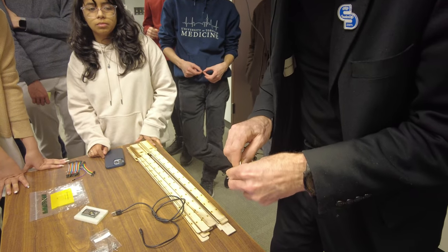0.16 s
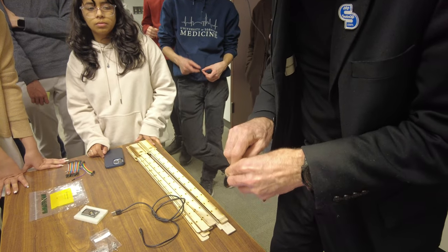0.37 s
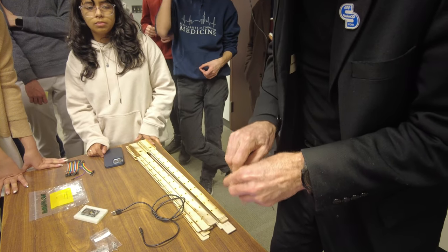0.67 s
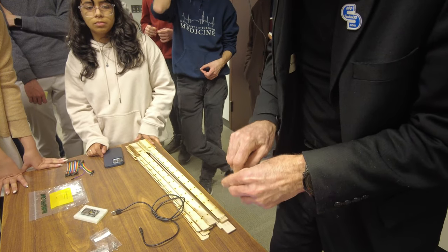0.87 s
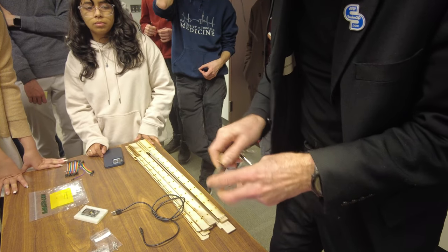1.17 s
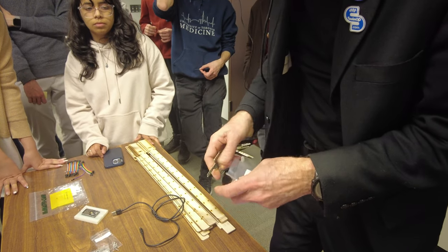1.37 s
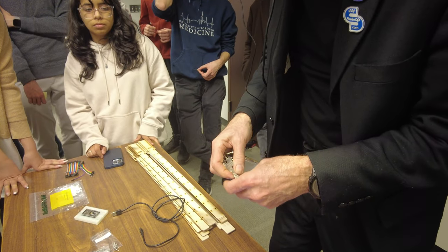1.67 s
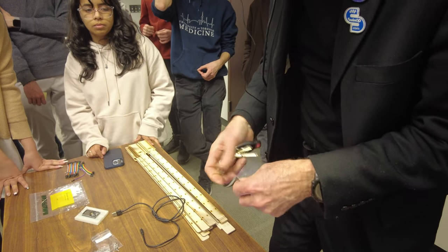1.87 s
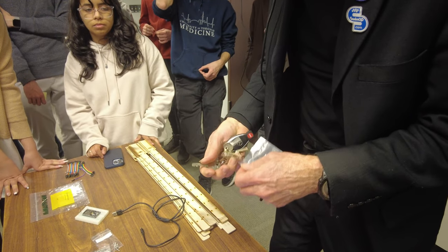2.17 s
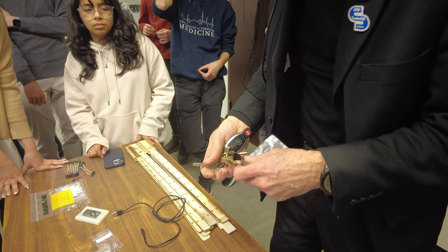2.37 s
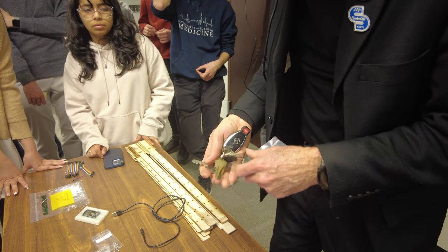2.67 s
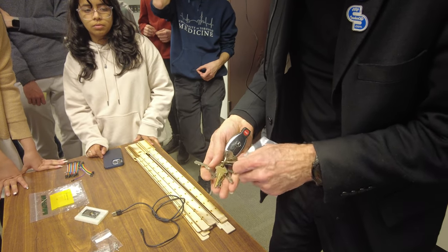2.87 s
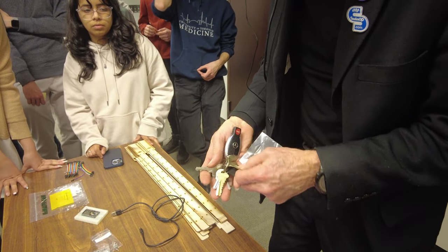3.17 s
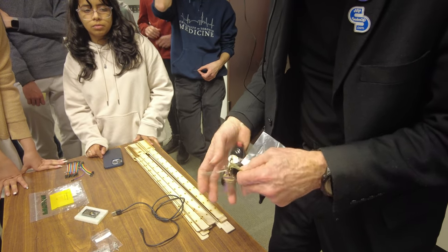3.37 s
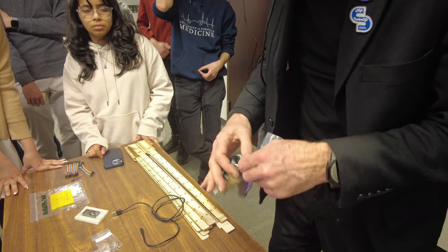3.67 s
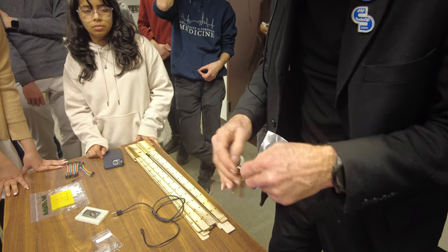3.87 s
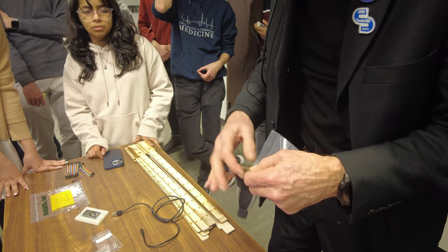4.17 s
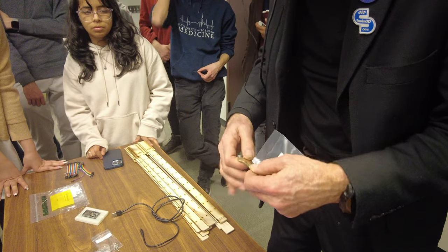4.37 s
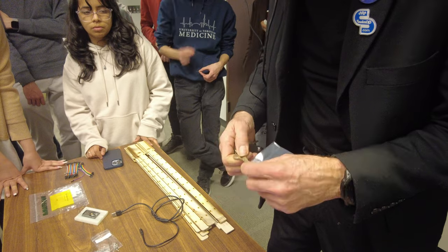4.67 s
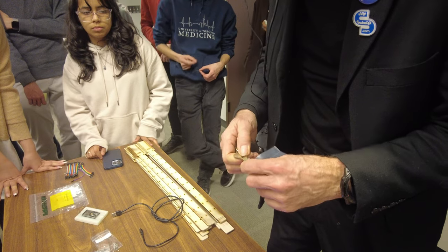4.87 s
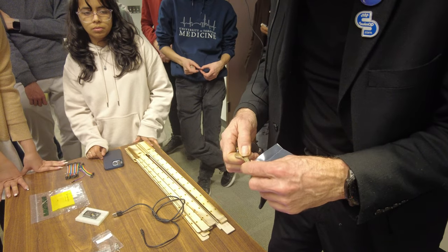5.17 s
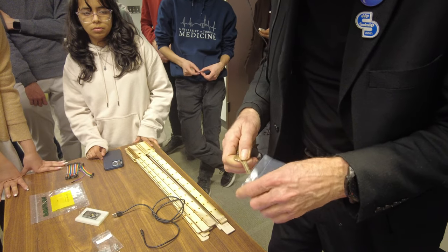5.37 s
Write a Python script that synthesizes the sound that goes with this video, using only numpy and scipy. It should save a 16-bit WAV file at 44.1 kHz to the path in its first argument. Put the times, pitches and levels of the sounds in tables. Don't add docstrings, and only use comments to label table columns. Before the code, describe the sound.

A steady low ventilation rumble with faint air hiss fills a quiet, fairly dry room. Close by, at arm's length, a small foil bag gives soft creases and rubs from 0.2 s, with its sharpest dry snaps at 0.7 to 0.8 s and light rustling until about 1.2 s. From 1.3 s keys begin to tick, with a clear click at 1.6 s and a denser run of little clinks from 2.0 to 2.4 s; a faint rubber sole squeaks farther away near 2.2 s. Bright clinks follow at 2.7 s, then sparse taps around 3.0 to 3.3 s. From 3.4 to 4.3 s the bunch jangles loosely, the strongest clash near 3.5 s, with short high rings quickly damped by fingers. A few clicks near 4.5 s give way to faint isolated ticks, and a soft bag stroke ends it around 5.5 s.

```python
import sys
import numpy as np
from scipy import signal
from scipy.fft import rfft, irfft, next_fast_len
from scipy.io import wavfile
from scipy.ndimage import uniform_filter1d

SR = 44100
rng = np.random.default_rng(int(sys.argv[2]) if len(sys.argv) > 2 else 0)


def gain_from_db(level_db):
    decades = np.asarray(level_db, float) / 20
    return 10 ** decades


def unload_wav(signal):
    wavfile.write(
        sys.argv[1],
        SR,
        np.round(np.clip(np.atleast_2d(signal).T, -1, 1) * 32767).astype(np.int16),
    )


N = 243178
SPAN = 8192
PORTS = np.array([[1], [-1]])

# (frequency [Hz], bandwidth [Hz], level [dB])
KEY_MODES = [(5680, 45, -5), (6350, 170, -10), (7440, 37, -10), (7590, 29, -11), (7770, 25, -11),
             (8540, 90, -16), (9260, 70, -15), (9470, 78, -14), (9790, 45, -15), (10400, 37, -5),
             (11100, 46, 0), (12400, 96, -1), (13200, 79, -6), (13700, 37, -5), (14400, 56, -3),
             (14600, 29, -5), (14900, 63, -3), (15200, 58, -1)]


def rms_one(x):
    return x / np.sqrt(np.mean(np.abs(x) ** 2) + 1e-20)


def at_hz(points, hz):
    points = np.array(points)
    return np.interp(np.log(hz), np.log(points[:, 0]), points[:, 1])


def gate(t, start, stop, rise, fall):
    release = 1 + np.exp(np.clip((t - stop) / fall, -50, 50))
    return np.clip((t - start) / rise, 0, 1) / release


def add(out, s, sound):
    at = round(s * SR)
    out[..., at:at + sound.shape[-1]] += sound


def resonance(grid_hz, hz, width_hz):
    damping = 1j * grid_hz * width_hz
    return damping / (hz ** 2 - grid_hz ** 2 + damping)


def grains(shape, per_s, spread_db):
    sizes = gain_from_db(spread_db * np.minimum(rng.exponential(1, shape), 4)) * rng.choice([-1, 1], shape)
    return sizes * (rng.random(shape) < per_s / SR)


def scattered(clicks, hz, colour, count):
    spacing_hz = 1000
    dealt = rng.integers(0, count, clicks.shape)
    regions = np.exp(-(hz / spacing_hz - np.arange(count)[:, None]) ** 2)
    regions = regions / np.sqrt(np.sum(regions ** 2, axis=0) + 1e-20)
    spectrum = sum(rfft(clicks * (dealt == k)) * region for k, region in enumerate(regions))
    return irfft(colour * spectrum, len(clicks))


def ventilation(spectrum, db):
    # (frequency [Hz], correlation [1])
    likeness = [(60, 1), (230, 0.91), (550, 0.21), (1650, 0.37), (4970, -0.17), (15000, 0.019)]
    # (frequency [Hz], left minus right [dB])
    balance = [(25, -2.5), (60, -0.5), (240, 1), (950, 2), (3770, 0), (15000, 1.5)]
    hz = np.fft.rfftfreq(N, 1 / SR) + 1
    mid, side = rfft(rng.standard_normal((2, N))) * gain_from_db(at_hz(spectrum, hz))
    alike = np.clip(at_hz(likeness, hz), -.99, .99)
    lean = at_hz(balance, hz) / 2
    pair = np.sqrt(1 + alike) * mid + np.sqrt(1 - alike) * side * PORTS
    return gain_from_db(db) * rms_one(irfft(pair * gain_from_db([lean, -lean]), N))


def background():
    # (frequency [Hz], density [dB per Hz])
    rumble = [(12, -37), (20, 1), (40, -2), (69, -14.5), (103, -4), (151, -14), (189, -16.5), (320, -27.5),
              (357, -27.5), (515, -29), (720, -35), (900, -39.5), (1170, -72), (1980, -120)]
    # (frequency [Hz], density [dB per Hz])
    hiss = [(530, -49), (900, -8.5), (1100, -8.5), (1410, -4), (1700, -8), (2860, -8.5), (3470, -12.5),
            (5350, -12), (6030, -10.5), (9200, -16.5), (10100, -22.5), (10900, -23.5), (16000, -22)]
    return ventilation(rumble, -45.5) + ventilation(hiss, -69.5)


def room(x):
    t60_s, treble_t60_share, level_db, wall_cut_hz = 0.12, .6, -9.5, 8500
    size, t = next_fast_len(N + SPAN), np.arange(SPAN) / SR
    dull = 1 / (1 + (np.fft.rfftfreq(size, 1 / SR) / wall_cut_hz) ** 4)
    first_echo = gate(t, .003, 0.93, 0.006, 1)
    echoes = rng.standard_normal((2, SPAN)) * first_echo * gain_from_db(-60 * t / t60_s)
    echoes = echoes / np.linalg.norm(echoes[0])
    short = echoes * gain_from_db(-60 * t / t60_s * (1 / treble_t60_share - 1))
    tail = dull * rfft(echoes, size) + (1 - dull) * rfft(short, size)
    return gain_from_db(level_db) * irfft(tail * rfft(x, size), size)[:, :N]


def squeak():
    start_s, hold_s, level_db, swell_db_per_s = 2.174, 0.065, -60, 70
    start_hz, sag_hz_per_s = 815, 1300
    t = np.arange(N) / SR - start_s
    wobble, grip = rms_one(uniform_filter1d(rng.standard_normal((2, N)), size=200))
    hz = np.maximum(start_hz - sag_hz_per_s * np.maximum(t, 0), 0)
    turns = np.cumsum(hz * (1 + .075 * wobble)) / SR
    on = gate(t, 0, hold_s, 0.0056, 0.016)
    level = level_db + swell_db_per_s * np.clip(t, 0, hold_s) + 4.4 * grip
    return on * gain_from_db(level) * np.sin(2 * np.pi * turns)


def bag_rubs():
    # (start [s], stop [s], level [dB], strongest [Hz], tilt [dB per octave])
    strokes = [(0.383, 0.452, -54, 1490, -1), (0.425, 0.508, -51, 2420, 1.5), (0.694, 0.73, -58, 2500, 4),
               (0.729, 0.8, -49, 3970, -2), (0.92, 0.957, -58, 1600, -7), (0.949, 1.028, -44.5, 1900, 0),
               (1.041, 1.094, -59, 2530, -1), (1.084, 1.097, -42.5, 4350, 0),
               (2.147, 2.212, -45, 1500, -6.5), (3.496, 3.502, -63, 1810, 9),
               (5.471, 5.518, -41.5, 1084, -7)]
    # (frequency [Hz], density [dB per Hz])
    foil = [(530, -40), (900, -11), (1700, -6), (3600, -9), (6200, -8), (7000, -12), (9500, -15),
            (16000, -19)]
    out, t, hz = np.zeros(N + SPAN), np.arange(SPAN) / SR, np.fft.rfftfreq(SPAN, 1 / SR) + 1
    patches = gain_from_db(3 * rms_one(uniform_filter1d(rng.standard_normal((len(strokes), SPAN)), size=250)))
    slips = patches * grains((len(strokes), SPAN), 20000, spread_db=2.6)
    for (s, stop, db, top_hz, tilt_db), slip in zip(strokes, slips):
        colour = gain_from_db(at_hz(foil, hz) + tilt_db * np.log2(hz / 3000))
        colour = colour * (1 + 0.77 * abs(resonance(hz, top_hz, top_hz * 0.69)))
        stroke = rms_one(slip) * gate(t + s, s, stop, .015, .007)
        add(out, s, gain_from_db(db) * scattered(stroke, hz, rms_one(colour), count=17))
    return out[:N]


def contacts(rows, per_s, touch, widen, crack_db, mid_db, high_db, clack_db, clack_width, luck_db, ping):
    out, t, hz = np.zeros((2, N + SPAN)), np.arange(SPAN) / SR, np.fft.rfftfreq(SPAN, 1 / SR)
    modes = np.array([gain_from_db(0.094 * db) * resonance(hz, mode_hz, widen * width) for mode_hz, width, db in KEY_MODES])
    rattle = grains((len(rows), SPAN), per_s, spread_db=3)
    luck = rng.standard_normal((len(rows), 3, len(KEY_MODES)))
    upper = resonance(hz, 12500, 8000) ** 2
    middle = resonance(hz, 5960, 7400) ** 4
    for k, (s, db, clack_hz, clack, bright, length) in enumerate(rows):
        u = t / max(length, .0003)
        push = rattle[k] * 8.5 * u * np.exp(-(2.87 * u) ** 0.67)
        push[0] = touch
        beam = np.exp(.5j * .95 * luck[k, 2] * PORTS)
        mix = gain_from_db(luck_db * luck[k, 0]) * np.sign(luck[k, 1])
        metal = rms_one(mix * beam @ modes) + gain_from_db(crack_db)
        hollow = 1 + ping * resonance(hz, clack_hz, 0.06 * clack_hz)
        thud = hollow * resonance(hz, clack_hz, clack_width * clack_hz) ** 2
        thud = thud / (1 + 1j * hz / (3 * clack_hz)) ** 2
        body = gain_from_db(clack + clack_db) * rms_one(thud)
        body = body + gain_from_db(mid_db) * rms_one(metal * middle)
        body = body + gain_from_db(bright + high_db) * rms_one(metal * upper)
        add(out, s, gain_from_db(db) * irfft(rfft(push / np.linalg.norm(push)) * body))
    return out[:, :N]


def bag_snaps():
    # (time [s], peak [dB], clack [Hz], clack [dB re peak], bright [dB re peak])
    creases = [(0.193, -45, 1370, -31, -25), (0.259, -47, 1590, -19, -20), (0.3799, -54.5, 1450, 8.5, -25),
               (0.4135, -57, 2500, 4, -25), (0.563, -43, 1600, -10.5, -22), (0.7004, -23.5, 1950, -24, -32),
               (0.744, -14, 1370, -29.5, -25), (0.8094, -21, 2420, -9, -18.5), (0.926, -57, 1410, 4.5, -30),
               (0.9417, -35, 3030, -8, -5), (0.9628, -41, 1380, -8.5, -18), (1.0962, -35, 2050, -17.5, -70),
               (1.157, -42, 1550, -19, -37)]
    rows = [(*row, 5.5 / row[2]) for row in creases]
    return contacts(rows, 2100, touch=8.8, mid_db=-4.5, high_db=14.0, clack_db=21.5, clack_width=1.57,
                    widen=9.0, crack_db=16, luck_db=2, ping=0)


def handling():
    # (time [s], rubbing level [dB])
    effort = [(1.25, -100), (1.9, -70), (2.2, -58), (2.32, -64.5), (2.4, -94), (3.2, -105), (3.33, -69.5),
              (3.45, -58.5), (3.57, -77), (3.63, -71), (3.68, -56.5), (3.77, -64), (3.805, -65),
              (3.84, -54.5), (4.06, -59), (4.15, -66), (4.3, -68), (4.4, -78.5), (4.7, -94)]
    # (frequency [Hz], density [dB per Hz])
    fob_colour = [(800, -28), (1400, -3), (2500, -1.5), (3200, 0.5), (4000, -3), (6200, -2), (9000, -9),
                  (16000, -12.5)]
    # (start [s], stop [s])
    hanging = [
        (2.24, 2.7),
        (3.38, 4.28),
    ]
    held_db, free_db = -15.5, 0.5
    t, hz = np.arange(N) / SR, np.fft.rfftfreq(N, 1 / SR) + 1
    shuffle_db = np.interp(t, *np.transpose(effort))
    free = sum(gate(t, s, stop, 0.045, 0.011) for s, stop in hanging)
    chatter_db = shuffle_db + held_db + (free_db - held_db) * free
    clumps = gain_from_db(2.5 * rms_one(uniform_filter1d(rng.standard_normal(N), size=300)))
    shuffle = scattered(clumps * grains(N, 12000, spread_db=3), hz, gain_from_db(at_hz(fob_colour, hz)), count=17)
    taps = clumps * gain_from_db(chatter_db) * grains((2, N), 3000, spread_db=3)
    taps = taps + taps[0]
    dealt, chatter = rng.integers(0, len(KEY_MODES), N), 0
    for k, (mode_hz, width_hz, db) in enumerate(KEY_MODES):
        r = np.exp(-np.pi * 1.3 * width_hz / SR)
        poles = [1, -2 * r * np.cos(2 * np.pi * mode_hz / SR), r * r]
        gain = gain_from_db(0.5 * db + 31.0) * (1 - r * r)
        chatter = chatter + signal.lfilter([gain, 0], poles, taps * (dealt == k) + 1e-18)
    fizz = gain_from_db(-11) * signal.sosfilt(signal.butter(2, 7000, "high", fs=SR, output="sos"), taps)
    on = gate(t, effort[0][0], effort[-1][0], 0.039, .02)
    return (gain_from_db(shuffle_db) * rms_one(shuffle) + chatter + fizz) * on


def free_rings():
    # (start [s], stop [s], frequency [Hz], level [dB])
    rings = [(1.098, 1.136, 574, -59), (1.348, 1.373, 3540, -58), (1.588, 1.614, 12400, -61),
             (2.132, 2.16, 12600, -57.5), (2.206, 2.223, 8000, -51), (2.278, 2.33, 13540, -69),
             (2.287, 2.323, 11800, -55), (3.104, 3.145, 10400, -65), (3.35, 3.379, 5650, -62),
             (3.37, 3.398, 8550, -55), (3.371, 3.4, 7550, -60), (3.415, 3.467, 13300, -45),
             (3.417, 3.5, 7840, -51), (3.484, 3.51, 5740, -42.5), (3.646, 3.74, 7660, -55),
             (3.65, 3.72, 13300, -59), (3.653, 3.7, 5690, -55.5), (3.669, 3.71, 10340, -50),
             (3.732, 3.785, 12600, -53), (3.877, 3.94, 13540, -58), (3.879, 3.94, 10450, -56),
             (3.986, 4.074, 10470, -48), (4.052, 4.15, 5760, -61), (4.127, 4.197, 13700, -62),
             (4.117, 4.27, 7700, -62), (4.118, 4.184, 11745, -65), (4.19, 4.285, 11750, -50.5),
             (4.196, 4.229, 10450, -60), (4.483, 4.52, 13300, -66)]
    out, t = np.zeros((2, N + SPAN)), np.arange(SPAN) / SR
    swing = uniform_filter1d(rng.standard_normal((len(rings), 2, SPAN)), size=700) * np.sqrt(700)
    for (s, stop, hz, db), (flutter, turn) in zip(rings, swing):
        t60 = .1 + .03 * hz / 1000
        shape = gate(t + s, s, stop, .003, .004) * gain_from_db(db - 60 * t / t60 + 3 * flutter)
        phase = 2 * np.pi * hz * t + 0.5 * turn + 0.14 * turn[0] * PORTS
        add(out, s, np.sqrt(2) * shape * np.sin(phase))
    return out[:, :N]


def pings(rows, t60):
    rise_s, level_db, phase_spread = 0.00074, 6, 0.45
    out, t = np.zeros((2, N + SPAN)), np.arange(SPAN) / SR
    for (s, hz, db), turn in zip(rows, rng.standard_normal(len(rows))):
        shape = (1 - np.exp(-t / rise_s)) * gain_from_db(db + level_db - 60 * t / t60)
        phase = 2 * np.pi * hz * t + phase_spread * turn * PORTS
        add(out, s - rise_s, shape * np.sin(phase))
    return out[:, :N]


def damped_modes():
    # (time [s], frequency [Hz], level [dB])
    early = [(1.629, 6330.0, -60), (1.631, 5650, -45.5), (1.6298, 15420.0, -49), (1.6299, 10210.0, -51),
             (1.63, 1870, -57), (2.0141, 12530.0, -53), (2.698, 2750, -61), (2.175, 4870.0, -54),
             (2.1837, 12190.0, -53), (2.2077, 10470.0, -56), (2.2083, 6500, -57), (2.288, 3190.0, -41.5),
             (2.2886, 14990.0, -52.0), (2.295, 4440.0, -50), (2.6902, 14900.0, -39), (2.6903, 11200.0, -55),
             (2.71, 8010.0, -50), (2.7113, 12450.0, -40), (2.7328, 10470, -38), (2.738, 2730, -58),
             (2.7281, 14600, -49), (2.729, 15760.0, -51), (2.73, 7580.0, -43.5), (2.7312, 12500, -35),
             (2.7328, 13200, -31), (2.7362, 7970, -42), (3.073, 2800, -65), (3.1724, 15720.0, -57.0),
             (3.2508, 10500, -52), (3.3525, 12360.0, -48.5), (3.4001, 11070.0, -47.5),
             (3.402, 8530.0, -51.5), (3.405, 7580.0, -51.5), (3.4134, 15250.0, -33), (3.414, 6420.0, -52.5),
             (3.4196, 14470.0, -37.5), (3.4215, 11070.0, -32.5), (3.4249, 8570.0, -51),
             (3.4273, 11760.0, -34.5), (3.4447, 15200.0, -43.5), (3.4574, 14560.0, -39.5),
             (3.476, 2670.0, -46.5), (3.4822, 9600, -51.5), (3.4822, 10160.0, -41), (3.4928, 15160.0, -29),
             (3.496, 8440.0, -50.0), (3.4967, 7450.0, -39), (3.5278, 11110.0, -45), (3.5311, 14690.0, -42),
             (3.532, 6600, -48), (3.5583, 14900.0, -50), (3.5589, 10770.0, -48.5), (3.5998, 12000, -34.5),
             (3.6002, 15590.0, -52.5), (3.603, 6800, -52), (3.6058, 14600.0, -54), (3.606, 13180.0, -42),
             (3.6066, 10460, -36), (3.6525, 13500, -43), (3.109, 2700, -52)]
    late = [(3.6565, 14690.0, -53), (3.6573, 12300, -41), (3.9748, 14000, -48), (3.6897, 14990.0, -48.0),
            (3.69, 7580.0, -51.0), (3.736, 7750.0, -57), (3.7443, 10340.0, -51), (3.753, 12490.0, -49),
            (3.756, 6330.0, -55), (3.7588, 15330.0, -52.0), (3.77, 8790.0, -57), (3.7719, 5700, -46),
            (3.8151, 14770.0, -38), (3.8154, 10300, -46), (3.815, 6840, -55), (3.816, 8500, -55.0),
            (3.8178, 6800, -50), (3.8182, 13700.0, -48.0), (3.8531, 12100, -41), (3.86, 4360, -48),
            (3.865, 7800.0, -59), (3.866, 14470.0, -48.0), (3.8662, 10500, -52), (3.881, 6400, -55.0),
            (3.8885, 11710.0, -56.0), (3.8904, 15200.0, -56.0), (3.8917, 12360.0, -50), (3.905, 7640, -49),
            (3.9086, 12270.0, -54.0), (3.921, 8600, -54), (3.93, 10160.0, -49), (3.954, 1670, -43),
            (3.974, 6290.0, -54), (3.99, 7600, -51), (3.9752, 12300, -49), (4.008, 6460.0, -55),
            (4.0349, 6360, -46), (4.0388, 13740.0, -49.0), (4.0434, 15420.0, -49.0),
            (4.0461, 12100.0, -48.0), (4.0487, 13220.0, -51.0), (4.059, 5120.0, -62), (4.0641, 11100, -42),
            (4.0679, 6440, -46), (4.068, 12880.0, -49.0), (4.068, 14810.0, -48.0), (4.073, 5710, -50),
            (4.074, 5670, -49), (4.108, 5700, -53.0), (4.1089, 15030.0, -44), (4.1307, 15160.0, -55.0),
            (4.13, 5900, -42.5), (4.185, 7690, -45), (4.185, 8500, -48), (4.1866, 6580, -38),
            (4.1875, 15680.0, -50), (4.2683, 13370, -49), (4.282, 6360, -52), (4.51, 7620.0, -59)]
    # (time [s], frequency [Hz], level [dB])
    lingering = [(1.63, 12360.0, -58.0), (2.2891, 13400, -46), (2.291, 10470.0, -52),
                 (2.326, 14940.0, -67.0), (3.1008, 10420.0, -56), (3.4035, 10050, -49), (3.42, 6700, -51),
                 (3.4842, 12450.0, -37.5), (3.4853, 11050, -33), (3.4922, 6340, -42.5),
                 (3.6736, 13400, -54), (3.7023, 9000, -64), (3.7322, 12060.0, -46.5),
                 (3.7359, 15160.0, -61), (4.0606, 15680.0, -48), (4.3356, 10470.0, -65)]
    return pings(early + late, t60=.024) + pings(lingering, t60=.065)


def key_clashes():
    # (time [s], peak [dB], clack [Hz], bright metal [dB re peak], rattle length [s])
    falls = [(1.342, -43.5, 3440, -16, 0.0095), (2.286, -41, 3040, -23, 0.0093),
             (2.673, -41, 2450, -16.5, 0.028), (2.727, -36, 2860, -3, 0.0059),
             (2.964, -42.5, 4160, -54, 0.0054), (3.401, -31, 3040, -8.5, 0.015),
             (3.42, -34.5, 2600, -4, 0.0071), (3.448, -37, 4200, -11, 0.02),
             (3.475, -26.5, 2000, -4, 0.013), (3.506, -38.5, 2670, -15, 0.019),
             (3.593, -36, 3800, -6, 0.0097), (3.681, -34.5, 4500, -13, 0.015),
             (3.75, -37, 1690, -13, 0.012), (3.81, -45, 4360, -53, 0.0098),
             (4.033, -32, 4100, -12.5, 0.019), (4.067, -36, 4360, -21, 0.0069)]
    rows = [(s, db, hz, -58 + 0.73 * (db + 35) - db, *rest) for s, db, hz, *rest in falls]
    return contacts(rows, 4000, touch=0.1, mid_db=15.0, high_db=28.0, clack_db=29.5, clack_width=1.0,
                    widen=3.0, luck_db=3, crack_db=-2, ping=.6)


def key_ticks():
    # (time [s], peak [dB], clack [dB re peak], bright metal [dB re peak])
    on_fingers = [(1.5067, -51, -9.5, -37), (1.575, -44.5, -9, -18), (2.249, -60, -16, -2),
                  (2.942, -41, -30, -3), (3.1705, -30.5, -35, -10), (3.3311, -53, -11, 6),
                  (3.59, -39, -46, -3), (4.572, -53, -27.5, -4), (4.7983, -49.5, -9, -20),
                  (5.013, -57.5, -4, -19), (5.276, -47.5, -14, -9.5), (5.487, -56, -16, -11)]
    on_fob = [(1.629, -25.5, -22.5, -11.5), (2.649, -40, -36, -10), (3.4762, -18.5, -19, -12),
              (3.7312, -30, -24, -5), (3.755, -30, -25, -5), (3.783, -35.5, -10.5, -3),
              (3.9525, -21.5, -29, -21), (3.4838, -27.5, -18.5, -24), (4.003, -39, -13, -24),
              (4.2845, -32.5, -24.5, -27.5), (4.335, -37.5, -20, -14.5), (4.4705, -28.5, -33.5, -29)]
    on_tag = [(1.543, -54, -11, -3), (1.6988, -32.5, -21.5, -9.5), (2.1776, -29, -20, -15),
              (2.206, -50, -20, -6), (2.351, -50, -2, -16), (2.6746, -36, -26, -2), (2.698, -41, -5.5, 3),
              (2.73, -42, -25, 5), (3.0453, -40, -20, -6), (3.0605, -48, -20, 1), (3.072, -49, -6, -13),
              (3.0836, -32, -26, -37), (3.0996, -31.5, -22.5, -11), (3.1286, -65, 14, -10),
              (3.248, -35.5, -19.5, -10), (3.2807, -34.5, -24, -15), (3.346, -27.5, -28, -12),
              (3.42, -36, -18, 7.5), (4.1305, -25, -24.5, -15)]
    on_bows = [(1.3316, -39, -20, -12), (1.3533, -44, -2, -33), (1.592, -46, -4.5, -3),
               (1.81, -42, -8, -14), (1.8435, -48.5, -8.5, -7), (1.9775, -40.5, -12, -10),
               (1.996, -56.5, 1, -13), (2.011, -36, -24, -15), (2.022, -63, -22, 19), (2.063, -47, -7, -9),
               (2.0846, -33.5, -13, -9.5), (2.13, -46, -9, -17), (2.137, -29.5, -15.5, -25),
               (2.2493, -32, -10, -13), (2.2885, -20.5, -22, -14), (2.3015, -38, -10, -25),
               (3.2386, -38, -16, -10), (3.368, -49, -21, 9), (3.399, -31, -35, -2), (3.415, -39, -26, -11),
               (3.5995, -30, -22, -2), (3.9745, -34, -22, 2), (4.1862, -23.5, -27, -15)]
    on_blades = [(2.1505, -37, -11, -26), (2.37, -50.5, -10, 1.5), (2.7096, -35, -14, 3),
                 (2.964, -37.5, -27, 0.5), (2.9704, -48, -40, 7), (3.5571, -29.5, -35, -10.5),
                 (3.643, -34, -13, 1), (3.656, -25.5, -32, -2.5), (3.6815, -30.5, -23, 1.5),
                 (3.8145, -36.5, -28, 5.5), (3.8515, -37, -19, 3), (4.037, -33, -37, 1),
                 (4.063, -30, -30, -4.5), (4.107, -26, -34, -10.5), (4.268, -27, -23, -10)]
    on_tips = [(2.0012, -53, -14, -18), (2.0785, -47, -12, -26), (2.0955, -44, -22, -4),
               (2.2425, -48, -7, -30), (2.806, -54, -30, 0), (4.4775, -40.5, -31, -2),
               (3.4523, -28, -24, -20), (3.5332, -30, -30, -19), (3.7012, -33.5, -11, -25),
               (3.7058, -37, -14, -28), (3.7743, -38, -15, -25), (3.8247, -37, -10, -25),
               (3.849, -39, -10, -22), (3.8625, -35, -13, -19.5), (3.9075, -33, -18, -19),
               (3.94, -31, -30, -15), (4.0484, -30, -16, -20), (4.0748, -33.5, -19, -22)]
    # (contacts, clack [Hz], rattle length [s])
    parts = [(on_fingers, 1530, .0019), (on_fob, 1770, .0025), (on_tag, 2700, .0035),
             (on_bows, 3180, .0022), (on_blades, 4350, .004), (on_tips, 4000, .0015)]
    rows = sorted((s, db, hz, clack, bright, length)
                  for struck, hz, length in parts for s, db, clack, bright in struck)
    return contacts(rows, 1500, touch=2.6, mid_db=1.0, high_db=11.5, clack_db=18.0, clack_width=0.98,
                    widen=6.0, luck_db=3, crack_db=3, ping=1.4)


def scene():
    air = background()
    impacts = bag_snaps() + key_ticks() + key_clashes()
    voices = free_rings() + damped_modes()
    near = impacts + voices + bag_rubs() + handling()
    far = squeak()
    into_room = (near - .6 * voices).mean(axis=0) + gain_from_db(14.5) * far
    return near + gain_from_db([[5.5], [2.5]]) * far + room(into_room) + air


def low_pass(x):
    return signal.sosfilt(signal.butter(12, 16970, fs=SR, output="sos"), x)


def record(dry):
    hz = np.fft.rfftfreq(N, 1 / SR)
    shelf = gain_from_db(-42 * np.clip((hz - 15900) / 150, 0, 1))
    mix = irfft(rfft(dry) * shelf, N)
    return low_pass(mix)


dry = scene()
out = record(dry)
unload_wav(out)
```